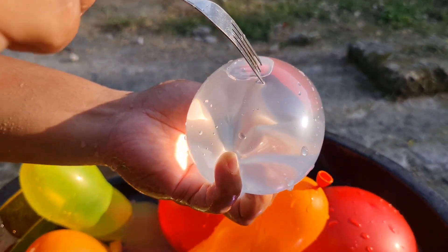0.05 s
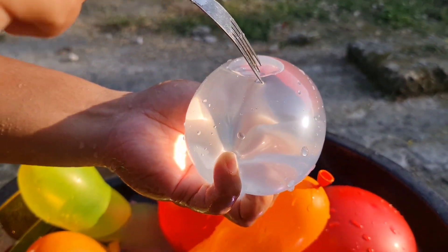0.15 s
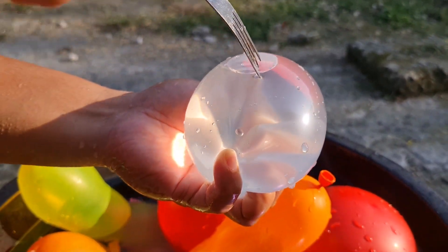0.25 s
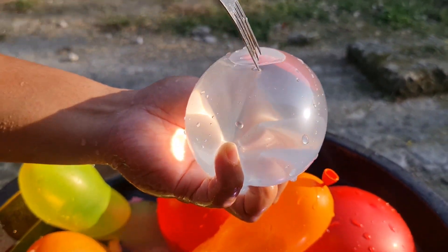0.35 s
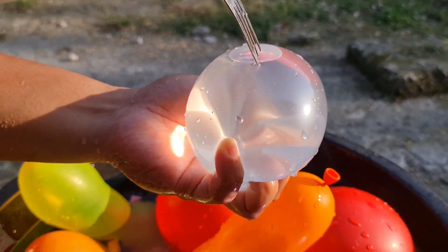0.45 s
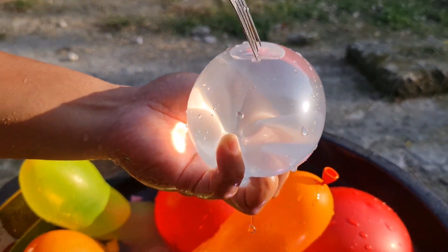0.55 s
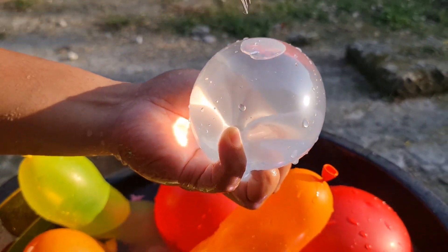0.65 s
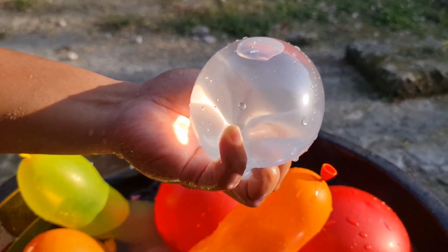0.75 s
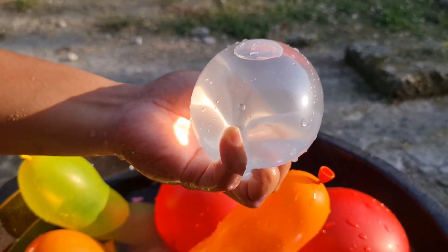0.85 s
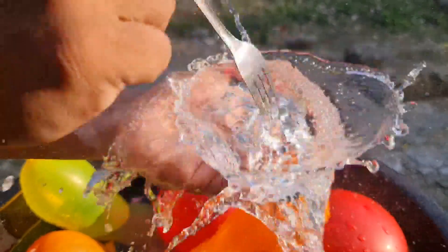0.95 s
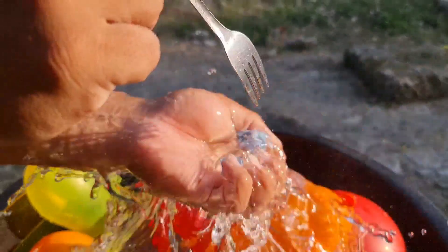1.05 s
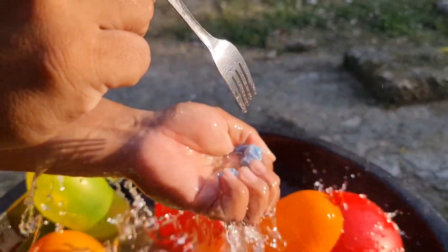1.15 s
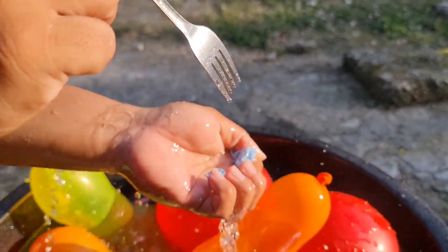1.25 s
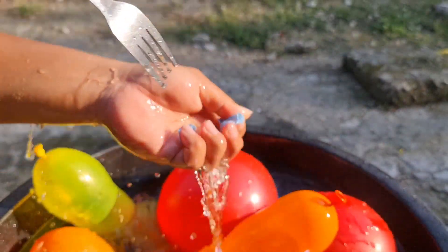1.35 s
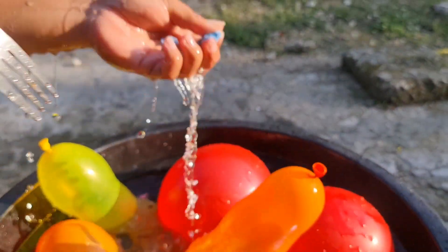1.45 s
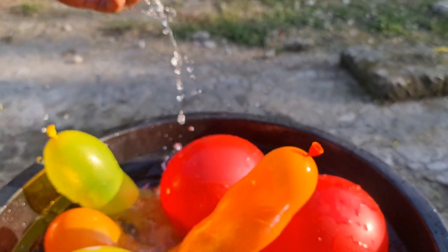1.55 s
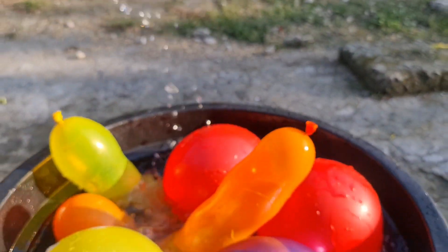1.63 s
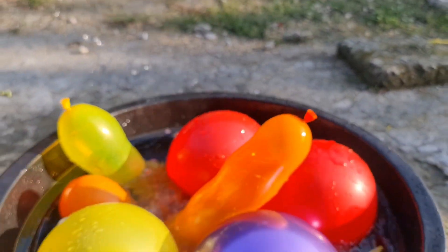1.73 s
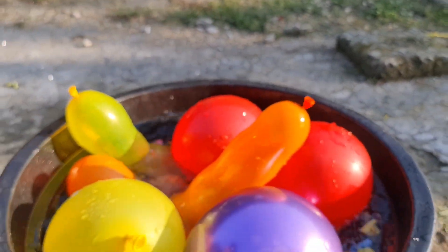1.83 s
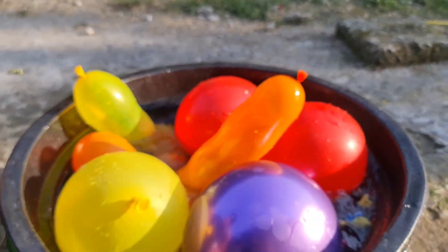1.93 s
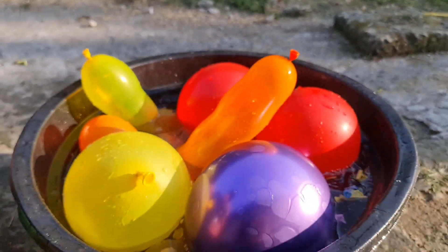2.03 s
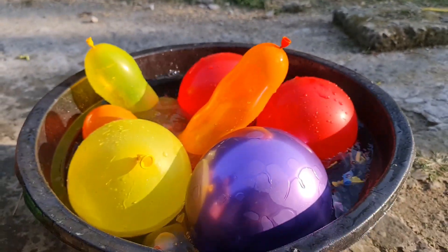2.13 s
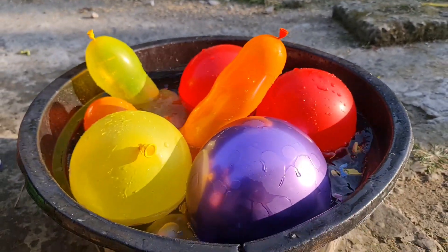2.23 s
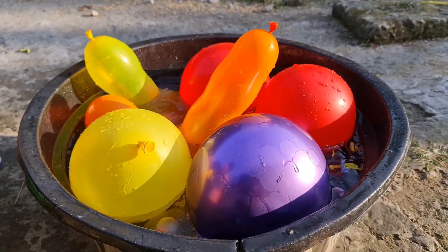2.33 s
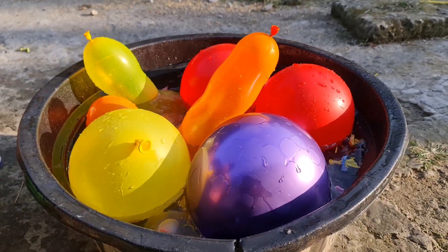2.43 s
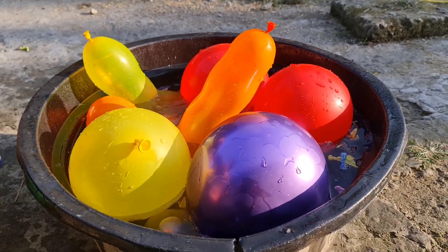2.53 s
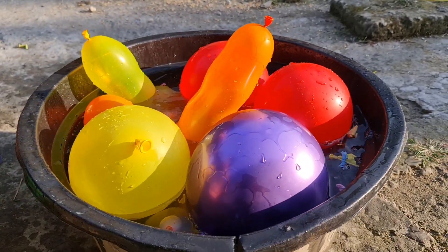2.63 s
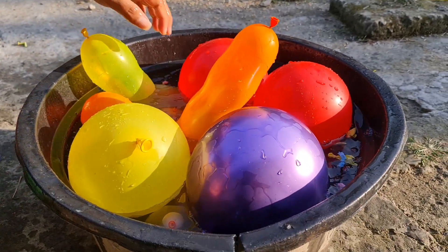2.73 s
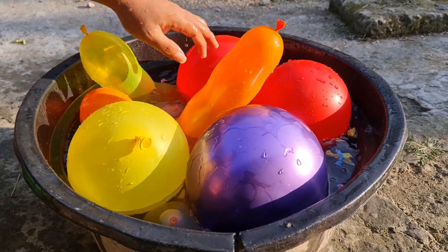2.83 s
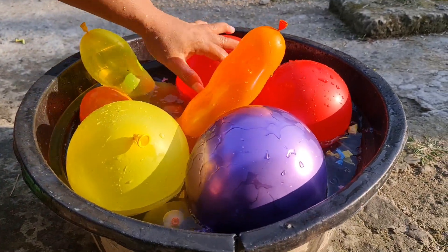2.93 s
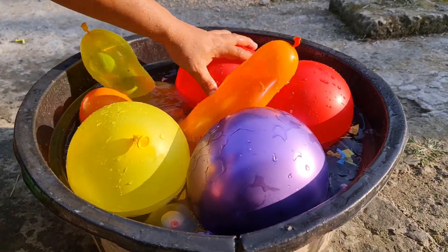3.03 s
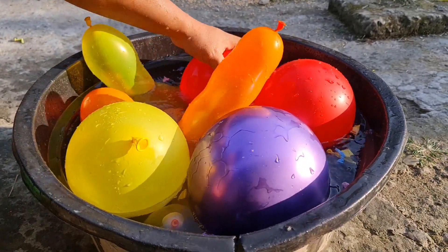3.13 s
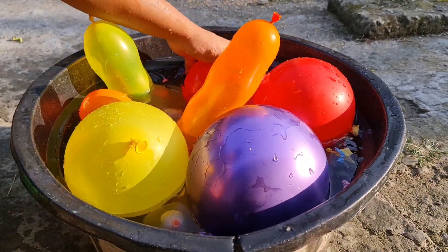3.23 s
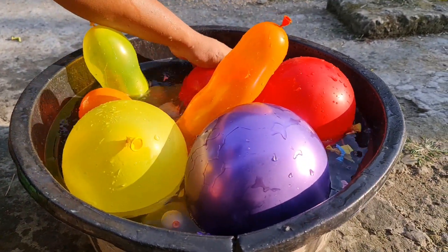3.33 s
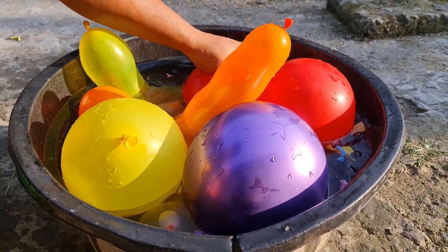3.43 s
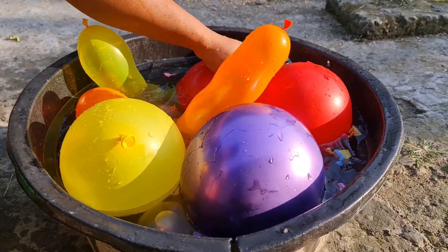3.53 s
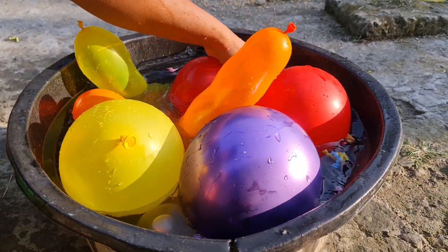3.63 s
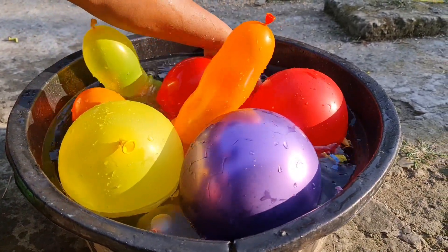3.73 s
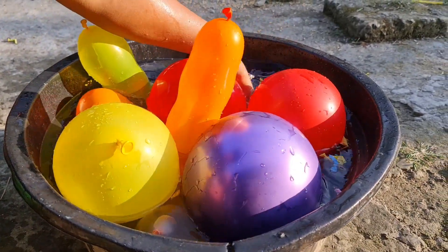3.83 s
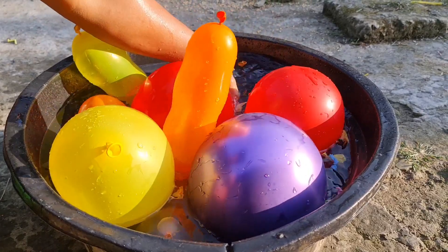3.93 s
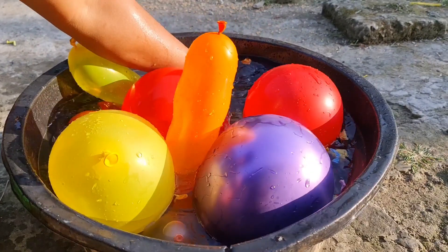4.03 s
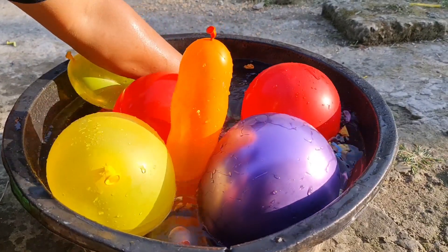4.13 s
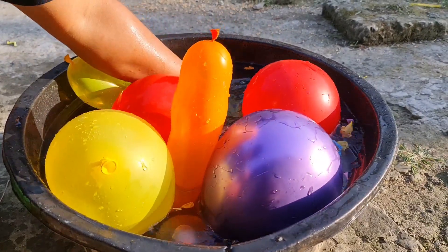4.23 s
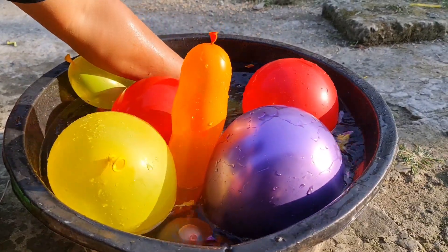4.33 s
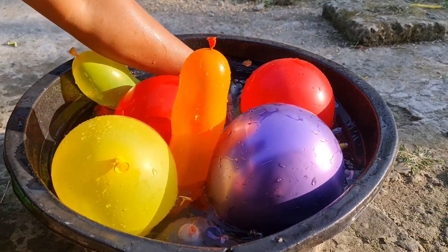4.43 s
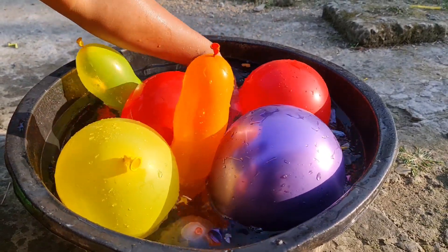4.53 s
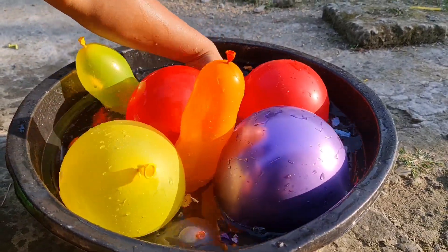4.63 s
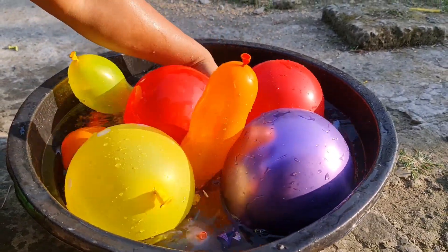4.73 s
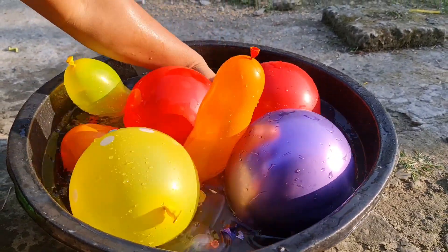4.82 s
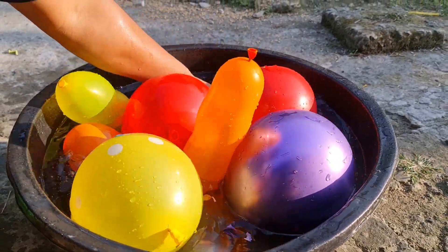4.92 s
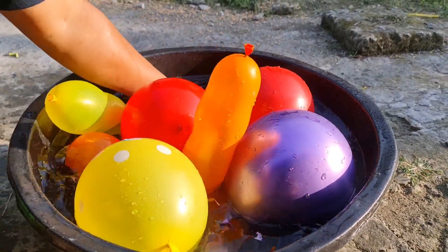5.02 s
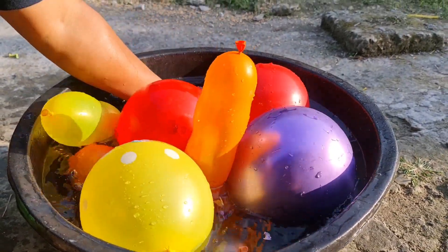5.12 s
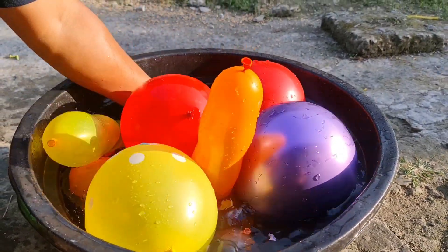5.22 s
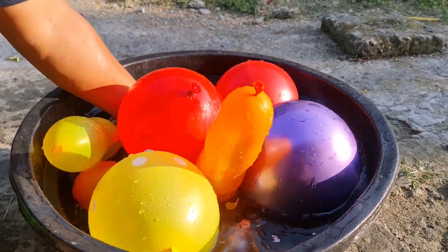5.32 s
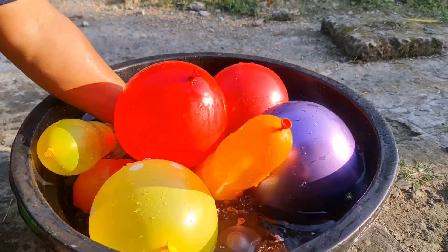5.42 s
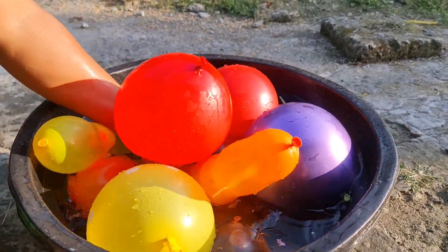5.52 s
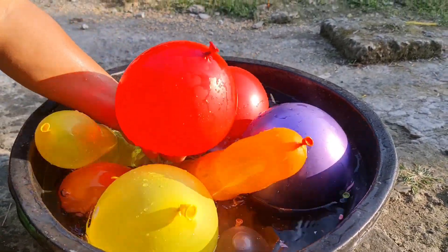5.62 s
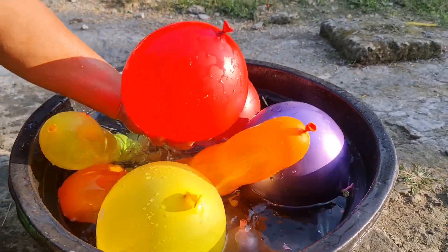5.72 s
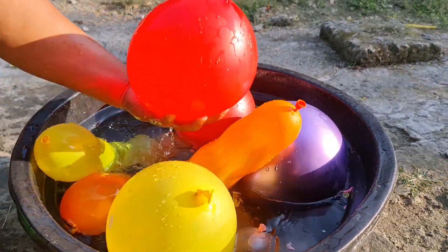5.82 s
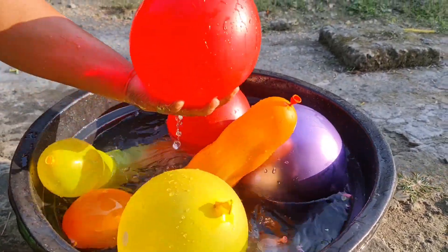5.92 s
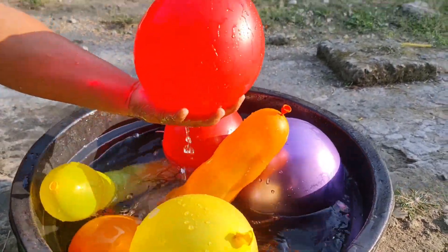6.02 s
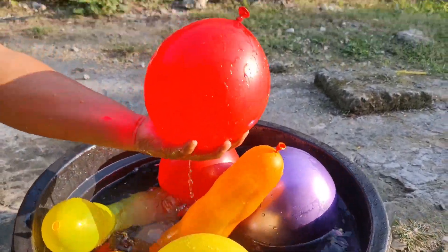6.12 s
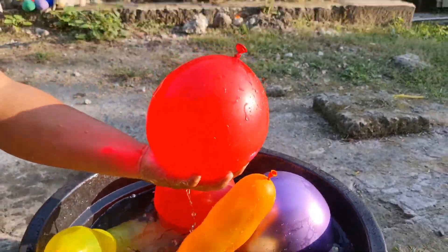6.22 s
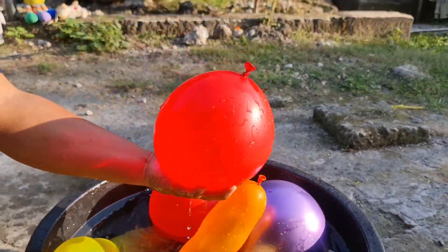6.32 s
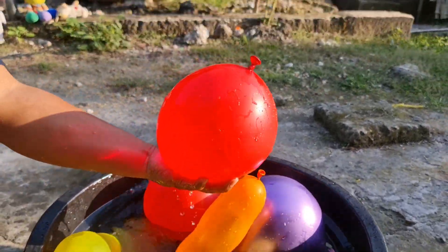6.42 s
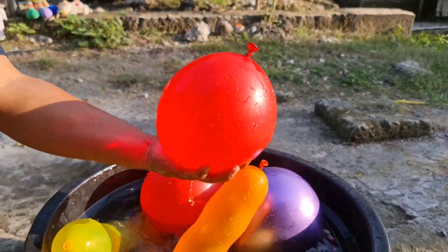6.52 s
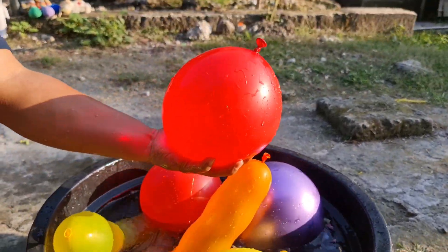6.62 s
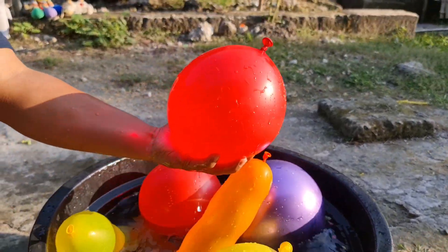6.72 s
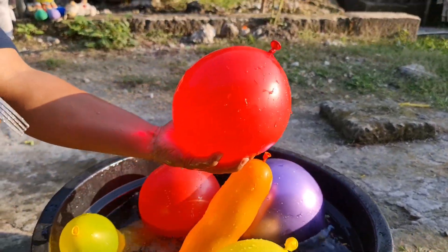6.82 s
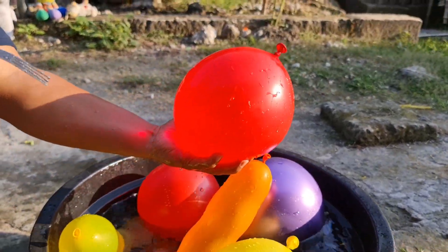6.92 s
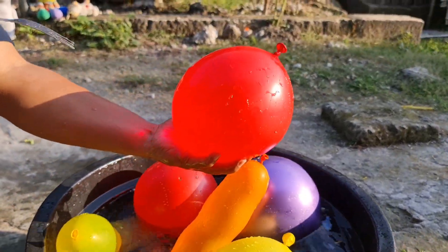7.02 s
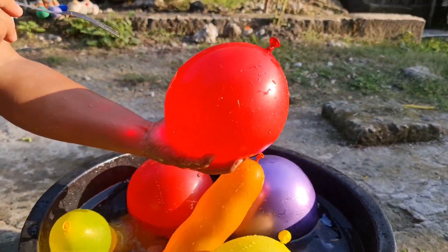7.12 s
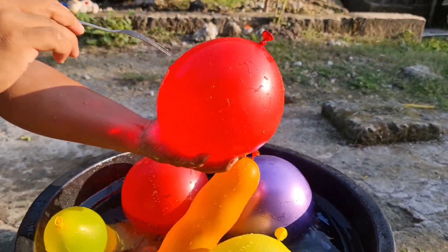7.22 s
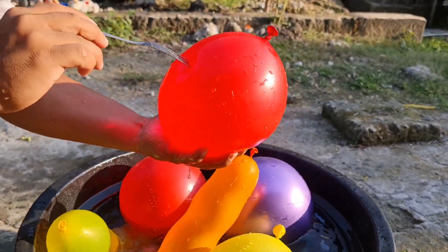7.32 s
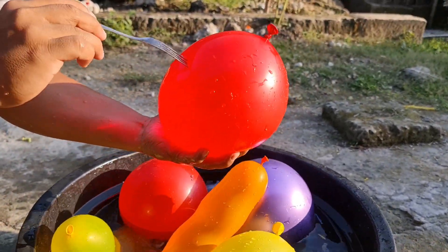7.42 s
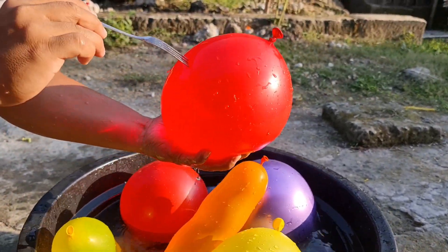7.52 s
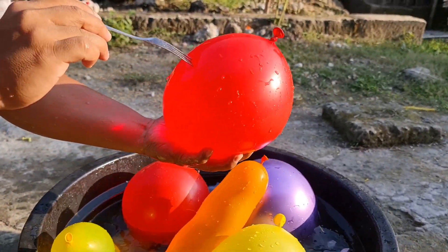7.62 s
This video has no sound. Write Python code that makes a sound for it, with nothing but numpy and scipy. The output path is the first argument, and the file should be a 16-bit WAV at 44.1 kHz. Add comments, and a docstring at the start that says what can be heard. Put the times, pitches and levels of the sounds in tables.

```python
"""A low engine idle and a faint creak of rubber, outdoors, at a close stereo pair beside a tub.
A water balloon bursts on a fork: the skin snaps, the water sprays out and booms into the tub. A hand digs
among wet balloons, which stick and slip in creaks and squeaks, and lifts one out dripping.
The one-cylinder engine nearby, each firing ringing its exhaust, revs up and changes gear;
a second one drones far off in the hush."""
import sys
import numpy as np
from scipy import signal
from scipy.fft import rfft, irfft, next_fast_len
from scipy.io import wavfile
from scipy.ndimage import uniform_filter1d

SR = 44100
rng = np.random.default_rng(int(sys.argv[2]) if len(sys.argv) > 2 else 0)


def to_wav(s):
    """Save 16-bit WAV."""
    ch = np.atleast_2d(s).T  # columns
    pcm = np.round(np.clip(ch, -1, 1) * 32767)  # PCM
    wavfile.write(sys.argv[1], SR, pcm.astype(np.int16))


N = 337806

# Spectrum of wet rubber rasping on rubber: frequency_hz, relative_db
RASP_SPECTRUM = [(1500, 2), (2100, -3.5), (2800, 3.5), (3500, 1.5), (4100, -3.5), (6500, -12), (9000, -18),
                 (13000, -21), (15800, -24)]


def amp(db):
    """Decibels to amplitude."""
    return 10 ** (np.asarray(db) / 20)


def unit(x):
    """Scales x to rms 1."""
    return x / np.sqrt(np.mean(x ** 2) + 1e-20)


def at_frequency(points, hz):
    """Reads a curve along a logarithmic frequency axis."""
    point_hz, value = np.transpose(points)
    return np.interp(np.log(hz + 1), np.log(point_hz + 1), value)


def follow(rows):
    """Start time of a curve, and its columns at every sample of its span."""
    times, *columns = np.transpose(rows)
    t = np.arange(max(times[0], 0), times[-1], 1 / SR)
    return t[0], [np.interp(t, times, column) for column in columns]


def add(mix, start_s, sound):
    """Mixes a sound in at start_s."""
    part = mix[round(start_s * SR):][:len(sound)]
    part += sound[:len(part)]


def filtered(x, order, hz, kind):
    """Butterworth filter."""
    return signal.sosfilt(signal.butter(order, hz, kind, fs=SR, output="sos"), x)


def resonate(x, hz, *widths_hz):
    """Resonances of gain 1 at hz in series, one for each width."""
    carrier = np.exp(2j * np.pi * np.cumsum(np.full(len(x), hz)) / SR)
    for width_hz in widths_hz:
        pole = np.exp(-np.pi * width_hz / SR)
        x = 2 * (carrier * signal.lfilter([1 - pole], [1, -pole], x / carrier)).real
    return x


def coloured(x, spectrum):
    """Shapes x with a spectrum, rms 1."""
    size = next_fast_len(len(x))
    gain = amp(at_frequency(spectrum, np.fft.rfftfreq(size, 1 / SR)))
    return unit(irfft(rfft(x, size) * gain, size)[:len(x)])


def levelled(x, window_s):
    """Evens out level changes slower than window_s."""
    window = round(window_s * SR)
    power = uniform_filter1d(uniform_filter1d(x ** 2, window), window)
    return x / np.sqrt(abs(power) + .03 * np.mean(x ** 2) + 1e-20)


def pulses(rate_hz, jitter, spread_db):
    """One click a cycle, uneven in time and size."""
    draw = rng.standard_normal((len(rate_hz) // 40 + 1, 2)).repeat(40, axis=0)[:len(rate_hz)]
    turns = np.cumsum(rate_hz * np.maximum(1 + jitter * draw[:, 0], 0)) / SR
    return (np.diff(np.floor(turns), prepend=0) > 0) * amp(spread_db * draw[:, 1])


def ring(hz, t60_s, rise_s, octaves=0):
    """A dying sine that glides by `octaves` in half its t60."""
    t = np.arange(round(np.clip(t60_s, .002, .2) * SR)) / SR
    turns = np.cumsum(hz * 2 ** (octaves * t / t60_s * 2)) / SR
    return np.sin(2 * np.pi * turns) * amp(-60 * t / t60_s) * (1 - np.exp(-t / rise_s))


def at_microphones(x, lag_samples, left_db, echo_db):
    """Sound reaches the right microphone later; short echoes off tub and balloons keep shifting."""
    opposed = 0.43  # share of the echoes in opposite phase at the two microphones
    tap, out = np.arange(600), np.zeros((2, N))
    direct = np.array([np.sinc(tap - 6), np.sinc(tap - 6 - lag_samples)])
    for k in range(3):
        echoes = rng.standard_normal((2, 600)) * (rng.random((2, 600)) < .1)
        echoes *= amp(-tap * 0.04) * (tap > 14)
        echoes[1] = np.sqrt(1 - opposed ** 2) * echoes[1] - opposed * echoes[0]
        echoes = filtered(echoes, 2, 380, "high")
        echoes *= amp(echo_db) / np.linalg.norm(echoes, axis=1, keepdims=True)
        share = 2 / 3 * np.cos(np.pi * (16 * np.arange(N) / SR + k / 3)) ** 2  # the three sum to 1
        out += signal.oaconvolve((x * share)[None], echoes + direct, axes=1)[:, 6:N + 6]
    return out * amp([[left_db / 2], [-left_db / 2]])


def air():
    """Outdoor hush all around: noise in drifting patches, swelling with fine spray after the burst."""
    # Colour of the hush: frequency_hz, relative_db
    spectrum = [(15, -38), (25, -39), (96, 3.5), (210, -14.5), (268, -23), (540, -21), (602, -28),
                (2140, -36), (2800, -37), (3290, -37.5), (7190, -43), (9420, -56), (14500, -51),
                (15700, -68)]
    # Hush above 250 Hz: time_s, gain_db
    hiss = [(0.0, -57.5), (2.67, -58.5), (3.95, -50), (4.48, -53.5), (5.48, -43.5), (5.7, -50),
            (7.12, -50.5), (7.66, -53)]
    # Hush below 250 Hz: time_s, gain_db
    rumble = [(0, -63), (.8, -62), (1.5, -60), (7.66, -60)]
    # Likeness of the two microphones: frequency_hz, correlation
    likeness = [(60, 0.93), (180, 0.83), (550, -0.56), (1650, -0.39), (4970, -0.28), (15000, 0.41)]
    mist_start_s, mist_rise_s, mist_top_db, mist_fall_db_per_s = 1.07, 0.2773, -30, 85
    frames, hz = N // 256 + 5, np.fft.rfftfreq(1024, 1 / SR)
    t = np.arange(frames) * 256 / SR
    left_re, left_im, apart_re, apart_im, patches = rng.standard_normal((frames, 513, 5)).T
    patches = unit(uniform_filter1d(uniform_filter1d(patches, 12, axis=0), 10, axis=1))
    same = at_frequency(likeness, hz)[:, None]
    left = left_re + 1j * left_im
    right = same * left + np.sqrt(1 - same ** 2) * (apart_re + 1j * apart_im)
    shape = amp(at_frequency(spectrum, hz))
    shape /= np.linalg.norm(shape[(hz > 2000) & (hz < 7000)])
    spectra = np.array([left * amp(-3), right]) * shape[:, None] * amp(2 * patches)
    mist = np.clip((t - mist_start_s) / mist_rise_s, 0, 1) ** 2
    mist *= amp(mist_top_db - mist_fall_db_per_s * np.maximum(t - mist_start_s - mist_rise_s, 0))
    high_gain = np.hypot(amp(np.interp(t, *np.transpose(hiss))), mist)
    low_gain = amp(np.interp(t, *np.transpose(rumble)))
    spectra *= np.where(hz[:, None] > 250, high_gain, low_gain)
    return signal.istft(spectra, nperseg=1024, noverlap=768)[1][:, :N]


def far_engine():
    """Far off, a second engine's firings ring two exhaust resonances into a drone."""
    # Course of the drone: time_s, firing_hz, level_db
    course = [(0, 20.7, -91), (.5, 29, -46.5), (.9, 33.4, -49), (1.6, 56, -52.5), (2.2, 29.2, -45.5),
              (2.6, 28.8, -45.5), (3, 33.3, -48.5), (4.5, 34.4, -53)]
    # Exhaust resonances: pitch_hz, width_hz, level_db
    exhaust = [(217.2, 8, -5.5), (362.5, 43, -16.5)]
    out = np.zeros(N)
    start_s, (firing_hz, level_db) = follow(course)
    firings = pulses(firing_hz, jitter=0.06, spread_db=.6)
    drone = sum(amp(db) * unit(resonate(firings, hz, width, width)) for hz, width, db in exhaust)
    add(out, start_s, drone * amp(level_db) * signal.windows.tukey(len(drone), .1))
    return out


def engine_idling():
    """Nearby, one cylinder fires unevenly and each puff booms in the exhaust."""
    # Course of the idle: time_s, firing_hz, level_db
    course = [(0.0, 18, -48), (0.63, 15.5, -84), (0.97, 15, -38), (1.29, 15, -32.5), (1.68, 16.8, -33),
              (2.22, 15.5, -34.5), (2.34, 17, -44), (2.8, 17.5, -39.5), (3.05, 19.5, -30.5),
              (3.2, 20, -28.5)]
    out, boom_hz = np.zeros(N), 91.3
    start_s, (firing_hz, level_db) = follow(course)
    firings = pulses(firing_hz, jitter=0.55, spread_db=2.8)
    boom = filtered(resonate(firings, boom_hz, 52, 71), 3, [45, 170], "band")
    add(out, start_s, amp(level_db) * levelled(boom, 0.041) * signal.windows.tukey(len(boom), .04))
    return out


def engine_pulling():
    """Under load the near engine gives clean harmonics, lifted by three exhaust resonances."""
    # Firing rate and exhaust resonances: time_s, firing_hz, low_db, main_db, upper_db, main_hz
    course = [(3.1, 24.57, -40, -31, -72, 140), (3.3, 24.83, -37.5, -30.5, -70, 140),
              (3.59, 26.26, -37, -31.5, -64, 140.6), (3.77, 27.46, -36, -37, -65, 140),
              (4.03, 28.17, -47, -29, -59, 144), (4.5, 28.02, -47, -31, -63, 140),
              (4.69, 28.26, -38.5, -34.5, -63, 160), (5.08, 24.27, -45, -34, -56, 144),
              (5.21, 24.82, -46, -26.5, -50.5, 154), (5.54, 25.72, -32.5, -28.5, -50, 155),
              (5.79, 25.82, -36.5, -27.5, -46.5, 145), (5.93, 26.1, -30, -32.5, -47.5, 151.5),
              (6.03, 26, -33, -34.5, -42.5, 137), (6.28, 27.35, -42, -28.5, -46, 144.7),
              (6.6, 27.37, -35, -27, -40.5, 143.6), (6.88, 27.47, -35.5, -27.5, -53, 149.2),
              (7.1, 28.72, -51, -33.5, -43.5, 146.3), (7.56, 28.57, -32, -36, -41.5, 151.6),
              (7.67, 28.6, -32, -53, -42, 152)]
    # Weak harmonics of steady strength: harmonic_number, level_db
    weak_harmonics = [(2, -47.5), (3, -90), (8, -58), (9, -62.5)]
    out, low_hz, upper_hz = np.zeros(N), 106.5, 320.7
    start_s, (firing_hz, low_db, main_db, upper_db, main_hz) = follow(course)
    exhaust = [(low_db, low_hz, 7.1), (main_db, main_hz, 16.7), (upper_db, upper_hz, 22)]
    turns = np.cumsum(firing_hz) / SR + 0.298
    phase = 2 * np.pi * turns
    firing_size = uniform_filter1d(amp(1.06 * rng.standard_normal(200))[turns.astype(int)], 500)
    tone = sum(amp(db) * np.cos(k * (phase - 0.7)) for k, db in weak_harmonics)
    tone += amp(upper_db - 3) * np.cos(7 * phase - 3.8)  # the 7th comes up with the upper resonance
    for k in (4, 5, 6, 10, 11, 12, 13):
        gain = sum(amp(db) / (1 + ((k * firing_hz - hz) / half_width_hz) ** 2)
                   for db, hz, half_width_hz in exhaust)
        tone += gain * np.cos(k * (phase - (0.54 if k < 10 else 0.882)))
    fade_in = np.minimum(np.arange(len(tone)) / (.1 * SR), 1)
    add(out, start_s, np.sqrt(2) * tone * firing_size * fade_in)
    return out


def droplets(count, per_s, low_hz, high_hz, cycles, spread_db):
    """Many tiny bubbles and drop hits, each of 40 pitches with its own random train."""
    out = np.zeros(count)
    for hz in np.geomspace(low_hz, high_hz, num=40):
        sizes = amp(spread_db * np.minimum(rng.exponential(1, count), 5))
        hits = rng.random(count) < per_s / 40 / SR
        bubble = unit(ring(hz, cycles / hz, 0.067 / hz, octaves=0.23)) * np.sqrt(hz)
        out += signal.oaconvolve(sizes * hits, bubble)[:count]
    return out


def drips():
    """Drops trap bubbles, whose pitch rises near the surface, or tick on taut rubber."""
    # Bubbles under falling drops: start_s, level_db, pitch_hz, t60_s, rise_octaves
    plops = [(1.172, 4, 1380, 0.0075, 0.19), (1.225, -22, 550, .031, 0.17), (1.265, -13, 1620, 0.016, 0.27),
             (1.533, -34, 527, 0.14, 0.23), (1.584, -29, 550, 0.021, 0.3), (1.649, -22, 477, 0.014, 0.2),
             (2.342, -44.5, 1667, 0.048, 0.12), (5.935, -29, 1450, 0.027, .1), (5.952, -38, 1252, .04, .15),
             (6.087, -31, 1308, .07, 0.17), (6.25, -44, 1190, 0.028, .1), (6.328, -35.5, 1219, 0.04, .1),
             (6.323, -42, 669, 0.12, 0.14), (6.486, -37, 698, 0.12, 0.14), (6.524, -31, 1057, 0.046, 1.34),
             (6.539, -34, 1610, .03, 0.052), (6.561, -42, 705, 0.087, .1), (6.685, -38, 1413, 0.044, 0.11),
             (6.725, -43, 1320, 0.041, .1), (6.779, -35, 1328, 0.036, 0.16),
             (6.804, -40, 2490, 0.028, 0.054), (7.215, -33.5, 1664, 0.026, .2),
             (7.246, -36, 2610, 0.029, 0.094), (7.262, -37, 1250, .04, .1), (7.3, -32.5, 2616, 0.026, .05),
             (7.306, -31.5, 1890, 0.031, .1)]
    # Drops on rubber: start_s, level_db, pitch_hz
    ticks = [(1.1494, -33, 1590), (1.287, -16, 1640), (1.3594, -23, 1710), (1.3944, -23.5, 1480),
             (1.4244, -36, 1560), (1.4394, -47, 1550), (1.5334, -29, 1700), (1.6496, -35, 1740),
             (1.7938, -47, 4100), (1.9013, -46, 7110), (2.58, -48, 1730), (2.6823, -49, 1708),
             (3.0771, -40, 4030), (3.1125, -40, 4250), (3.4243, -36, 4030), (3.4737, -26.5, 4140),
             (3.535, -37, 4580), (3.7136, -34.5, 6300), (3.7795, -28, 7860), (3.797, -30, 4230),
             (3.8508, -48, 4226), (3.997, -34, 5800), (4.0783, -44, 5730), (4.0923, -37, 4040),
             (4.2739, -52.5, 4970), (4.3048, -29, 4880), (4.5487, -33.5, 4870), (4.7682, -39, 5790),
             (5.1419, -36, 4600), (5.1748, -38, 4000), (5.2701, -27, 5060), (5.3404, -28.5, 4100),
             (5.3784, -31.5, 4064), (5.4123, -32, 3960), (5.4487, -28.5, 4010), (5.6477, -26, 4900),
             (5.8842, -47, 4030), (6.1945, -27, 4190), (6.3147, -29, 4820), (6.3791, -29, 4150),
             (6.6739, -35.5, 8740), (6.7238, -37, 6970), (6.8276, -41, 3935), (6.8705, -40, 7040),
             (6.9124, -32.5, 8600), (7.2431, -37.5, 5026), (7.3788, -35, 5150)]
    out = np.zeros(N)
    for start_s, db, hz, t60_s, octaves in plops:
        add(out, start_s, amp(db) * ring(hz, t60_s, 0.00024, octaves))
        slap = ring(1.4 * hz, 0.31 * t60_s, 0.00026, octaves=-0.16)
        add(out, start_s - .002, amp(db - 14) * slap)
    spatter = droplets(N, per_s=90, low_hz=465, high_hz=4800, cycles=3.1, spread_db=2.8)
    out += amp(-70) * unit(spatter)
    t = np.arange(500) / SR
    for start_s, db, hz in ticks:
        t60_s = 0.0092 * (1000 / hz) ** 0.52  # higher ticks are shorter
        edge = np.diff(rng.standard_normal(501)) * amp(-9.5 - 60 * t / t60_s)
        add(out, start_s, amp(db) * edge * (1 - np.exp(-t / 0.00012)))
        add(out, start_s, amp(db + 8) * ring(hz, 0.53 * t60_s, 1e-4))
    return out


def rubber_creaks():
    """Wet balloons rub: stick-slip clicks ring two modes of the balloon, each with a short rasp."""
    # Strokes of rubber on rubber, second mode and rasp relative to the body mode:
    # start_s, length_s, swell_share, swell_db, top_db, body_hz, second_db, rasp_db
    strokes = [(0.0, 0.094, 0.27, 2.6, -51.5, 630, -0.5, -2), (0.699, 0.019, 0.14, 3, -45.5, 676, 6, -1),
               (.74, 0.065, 0.18, 8, -57, 566, 3, 0), (3.015, 0.12, 0.31, 15, -35, 655, -9.5, -12.5),
               (3.15, .285, 0.93, 18.4, -28, 620, -33, -50), (3.425, 0.056, 0.53, 15, -13, 520, -40, -38),
               (3.47, 0.12, 0.11, 1.5, -19.5, 495, -35, -46), (3.56, 0.13, 0.19, 4, -24, 500, -45, -39),
               (3.69, 0.084, 0.42, 3, -38, 536, -25, -32), (3.76, 0.084, 0.27, 3.3, -41, 570, -8, -3.5),
               (3.855, .13, 0.77, 5.5, -30, 577, -4, -12), (4.155, .083, 0.76, 1.1, -20.5, 500, -15.5, -10),
               (4.23, 0.062, .15, 3, -42.5, 466, -15, -9), (4.35, 0.19, 0.58, 19, -39, 602, -18, -33),
               (4.52, .1, 0.085, 5.1, -38.5, 427, -11, -7.5), (4.69, 0.055, 0.24, 4, -47, 594, -4, -11),
               (4.752, 0.046, 0.12, 8, -30.5, 644.7, -17, -30),
               (4.79, 0.17, 0.8, 19.4, -34, 570, -2.5, -1.5), (5.04, 0.071, 0.59, 9, -34, 695, 0.5, -8),
               (5.175, 0.062, 0.38, 7.6, -35.5, 690, 2.5, -9), (5.21, 0.039, 0.66, 7.4, -49, 688, -5, 10),
               (5.255, 0.064, 0.61, 11, -31, 565, -39, -35),
               (5.32, 0.053, 0.53, 6.3, -30.5, 670, -2.5, -13),
               (5.385, 0.2, 0.58, 15, -36.5, 700, 3.5, -26),
               (5.53, 0.13, 0.67, 8.7, -21.5, 680, -21, -13.5), (5.65, 0.052, .1, 3, -45, 600, -16, -3),
               (5.755, 0.12, 0.74, 14, -46, 486, 0.5, -9), (5.89, .2, .22, 12, -47.5, 464, -3, -15),
               (6.36, 0.053, .5, 4, -49, 424.6, 4, 5.5), (6.427, 0.046, .8, 1.7, -56, 430, 12, 10),
               (7.13, 0.14, .4, 8, -52.5, 399.4, 7, 3), (7.24, 0.094, 0.68, 14, -46, 444, -7, 1)]
    out, slips_per_s, fade_db = np.zeros(N), 170, -16
    for start_s, length_s, swell_share, swell_db, top_db, body_hz, second_db, rasp_db in strokes:
        count = round(length_s * SR)
        progress = np.arange(count) / (length_s * SR)
        swell_left = np.maximum(1 - progress / swell_share, 0)
        fade = np.maximum((progress - swell_share) / (1 - swell_share), 0) ** 2
        level_db = top_db - swell_db * swell_left + fade_db * fade
        # a slacker, lower balloon throws its second mode higher; it rises a little through the stroke
        second_hz = 1368 * (620 / body_hz) ** 0.27 * (1 + 0.034 * (progress - .5))
        slips = pulses(np.full(count, slips_per_s), jitter=.65, spread_db=3.3)
        slips += 0.0097 * rng.standard_normal(count)
        body = levelled(filtered(resonate(slips, body_hz, 305, 440), 4, 340, "high"), 0.029)
        second = levelled(resonate(slips, second_hz, 410, 1800), 0.17)
        gate = 0.5 + signal.lfilter([1], [1, -np.exp(-1 / (0.001 * SR))], slips)
        rasp = levelled(gate * coloured(rng.standard_normal(count), RASP_SPECTRUM), 0.03)
        creak = body + amp(second_db) * second + amp(rasp_db) * rasp
        edges = signal.windows.tukey(count, min(0.0041 / length_s, 1))
        add(out, start_s, amp(level_db) * creak * edges)
    return out


def rubber_slips():
    """One hard slip rings two modes and rasps; dry, raspy slips shake the whole balloon more."""
    # Hard slips, second mode and rasp relative to the body: start_s, level_db, body_hz, second_db, rasp_db
    slips = [(0.704, -30, 614, 4, -1), (2.834, -32.5, 638, -3, -2), (2.901, -27, 619, -1, -10),
             (2.987, -20.5, 1016, -.6, -15), (3.053, -19, 500, -13, -24), (3.094, -16, 905, 1.5, -16),
             (3.114, -31, 540, -7, 1.5), (3.188, -22, 720, -23, -27), (3.209, -23, 535, -4, -24),
             (3.267, -23, 574, -1, -15), (3.31, -14, 610, -4, -42), (3.327, -10, 560, -11, -48),
             (3.347, 0.5, 630, -8, -38.5), (3.378, -9, 630, -17, -47), (3.389, -8, 885, -12, -45),
             (3.403, -1, 673, -13, -42), (3.421, 0, 706, -9, -32), (3.433, -8, 530, -13, -43),
             (3.447, -8, 524, -22, -38), (3.495, 1.5, 614, -17, -43), (3.51, -2.2, 425, -21, -32),
             (3.532, 2.3, 535, -25, -42), (3.551, -0.5, 580, -23, -24.5), (3.594, -6, 550, -33, -24),
             (3.615, -0.7, 473, -30, -30), (3.657, -10, 635, -27, -31), (3.668, -8.5, 507, -22, -43),
             (3.849, -22.5, 429, -5, -6), (3.859, -20.5, 640, -1, -4), (4.0742, .4, 840, -3.5, -23),
             (4.0905, 3.5, 860, -7, -16.5), (4.106, -.4, 744, -6, -11), (4.122, 1.5, 541, -1, -16),
             (4.1367, 2.5, 891, -2, -16), (4.149, 1.7, 950, -2, -19), (4.159, -12, 537, -24, -12),
             (4.177, -16, 530, -19, 1), (4.19, -4, 530, -3, -19), (4.447, -23.5, 485, 5, -20),
             (4.541, -16, 384, -3, -30), (4.846, -20, 540, -10, -21), (5.267, -25, 493, -6, -20),
             (5.289, -21, 486, 0, -33), (5.316, -13, 460, -8, -30), (5.343, -36, 620, .4, -17),
             (5.378, -18.5, 640, 0, -10), (5.411, -20.5, 537.6, 6, -7), (5.433, -24, 943, -8, -27),
             (5.445, -29, 653, 3, -8), (5.9, -29.5, 536, 6, -2.5)]
    thud_hz, second_hz, body_cycles, rasp_t60_s = 198, 1368, 9.25, .012
    out, t = np.zeros(N), np.arange(600) / SR
    rasp_envelope = amp(-60 * t / rasp_t60_s) * (1 - np.exp(-t / 0.00088))
    for start_s, db, body_hz, second_db, rasp_db in slips:
        add(out, start_s, amp(db - 3 + 0.34 * rasp_db) * ring(thud_hz, 0.028, 0.0017))
        add(out, start_s, amp(db) * ring(body_hz, body_cycles / body_hz, 0.00081, octaves=0.032))
        add(out, start_s, amp(db + second_db) * ring(second_hz, 0.0072, 0.0013))
        rasp = coloured(rng.standard_normal(600), RASP_SPECTRUM)
        add(out, start_s, amp(db + rasp_db) * rasp_envelope * rasp)
    return out


def rubber_squeaks():
    """The skin sings as it slides, its gliding pitch unsettled by the grip."""
    # Squeaks: start_s, length_s, first_hz, last_hz, level_db, fall_per_overtone_db
    squeaks = [(3.447, 0.023, 513, 535, -4, 36), (4.535, .024, 370, 393, -25.5, 20),
               (4.757, 0.019, 549, 684, -19.5, 33), (5.028, 0.056, 1450, 716, -36, 4),
               (5.188, 0.0393, 1306, 1800, -27, 15), (5.224, 0.016, 1770, 2880, -35, 6.5),
               (5.332, 0.036, 1222, 1850, -30, 5), (5.561, 0.053, 509.5, 567, -19, 11.5),
               (5.618, 0.0297, 560, 953, -18.5, 20), (3.624, 0.02, 790, 850, -23.5, 25)]
    out = np.zeros(N)
    for start_s, length_s, first_hz, last_hz, db, fall_db in squeaks:
        progress = np.arange(round(length_s * SR)) / (length_s * SR)
        hz = first_hz * (last_hz / first_hz) ** progress
        waver = .12 * uniform_filter1d(rng.standard_normal(len(hz)), 60)
        turns = np.cumsum(hz * (1 + waver)) / SR
        tone = sum(amp(-fall_db * k) * np.sin(2 * np.pi * (k + 1) * turns) for k in range(5))
        add(out, start_s, amp(db) * tone * np.sin(np.pi * progress ** 0.84) ** 0.52)
    return out


def splash():
    """A brief hiss, then water sprays to one side and lands: fine drops, fizz and gurgling bubbles."""
    # First a brief bright hiss swelling just before the snap, then water landing on balloons and tub;
    # gurgle and fizz relative to the level: start_s, rise_s, level_db, t60_s, gurgle_db, fizz_db
    swells = [(0.907, 0.024, -24.5, 0.062, -13.5, 3), (0.936, 0.026, -24, 0.39, -4.5, -7.5),
              (1.028, 0.039, -34.5, 1.5, 7, -8), (1.117, 0.016, -24.5, 0.66, 5, -9),
              (1.165, 0.0075, -22.5, 0.3, 3.5, -12), (1.19, 0.055, -26, 0.37, 1, -11.5),
              (1.29, 0.027, -32.5, .5, 4.5, -6.5), (1.385, .012, -39, 0.27, 0, -4),
              (1.52, 0.022, -42.5, 0.61, 1, -9), (1.62, .03, -50, 0.15, 4.5, -9),
              (1.6, 0.072, -63, 2.2, -6, 2), (2.018, 0.022, -60, 0.29, -22.5, 4)]
    # Colour of the spray: frequency_hz, relative_db
    spectrum = [(530, -29.5), (900, -17), (967, -19), (1380, -3), (2110, -6.5), (2940, -2.5), (6030, -18),
                (8140, -30.5), (13800, -30), (15700, -36.5)]
    out, count = np.zeros(N), 3 * SR
    t, power = np.arange(count) / SR, np.zeros((3, count))
    for start_s, rise_s, db, t60_s, gurgle_db, fizz_db in swells:
        attack = np.clip((t - start_s) / rise_s, 0, 1) ** 2
        decay = amp(db - 60 * np.maximum(t - start_s - rise_s, 0) / t60_s)
        power += (attack * decay * amp([[0], [gurgle_db], [fizz_db]])) ** 2
    drops = droplets(count, per_s=5000, low_hz=1020, high_hz=15000, cycles=9.5, spread_db=3.5)
    spray = coloured(unit(drops) + 0.5 * rng.standard_normal(count), spectrum)
    fizz = unit(filtered(spray, 4, 6800, "high"))
    body = unit(filtered(spray, 4, 6800, "low"))
    bubbles = droplets(count, per_s=1200, low_hz=385, high_hz=1300, cycles=31, spread_db=2.9)
    gurgle = levelled(bubbles, .05)
    add(out, 0, (np.sqrt(power / 2) * [body, gurgle, fizz]).sum(axis=0))  # half the power on each side
    return out


def burst():
    """The skin snaps and tears on the fork; the freed water thumps, then lands in the tub."""
    # The mass of water booms the tub: start_s, level_db, pitch_hz, t60_s
    landings = [(1.121, -16.5, 63.3, 0.24), (1.151, -18.5, 85, 0.19)]
    out, snap_s, tear_t60_s = np.zeros(N), .9297, .008
    add(out, snap_s - .0002, amp(-1) * ring(2000, 0.0032, 5e-5))
    add(out, snap_s, amp(1) * ring(7800, 0.0025, 3e-5))
    add(out, snap_s - .0001, amp(-6) * ring(11500, 0.00094, 2e-5))
    tear = amp(-15 - 60 * np.arange(2000) / SR / tear_t60_s) * rng.standard_normal(2000)
    add(out, snap_s, tear)
    add(out, snap_s, amp(-20) * ring(78, 0.042, .002))  # thump
    for start_s, db, hz, t60_s in landings:
        add(out, start_s, amp(db) * ring(hz, t60_s, .008))
    return out


def scene():
    """Tub close to the microphones, engines beyond it, open air all around."""
    mix = at_microphones(splash(), lag_samples=0.58, left_db=0.6, echo_db=3.6)
    mix += at_microphones(splash(), lag_samples=6.7, left_db=-5, echo_db=-3)
    mix += at_microphones(burst(), lag_samples=3.2, left_db=-2.1, echo_db=-18.5)
    rubber = rubber_creaks() + rubber_slips() + rubber_squeaks()
    mix += at_microphones(rubber, lag_samples=7, left_db=-3.5, echo_db=4.2)
    mix += at_microphones(drips(), lag_samples=1.9, left_db=-2, echo_db=10.45)
    engines = engine_idling() + engine_pulling() + far_engine()
    mix += at_microphones(engines, lag_samples=5, left_db=-4, echo_db=-39.5)
    return mix + air()


def record(dry):
    """The loudest peaks overload softly, and the top treble is cut off."""
    overloaded = np.tanh(dry / 1.14) * 1.096
    low_pass = signal.firwin(511, 15870, window=("kaiser", 9), fs=SR)
    return signal.oaconvolve(overloaded, low_pass[None], "same")


dry = scene()
out = record(dry)
to_wav(out)
```